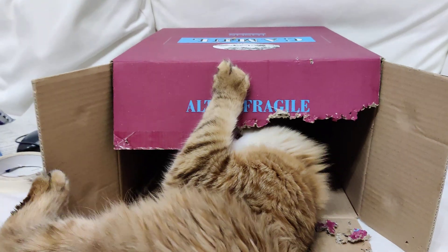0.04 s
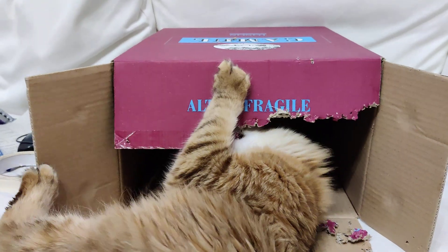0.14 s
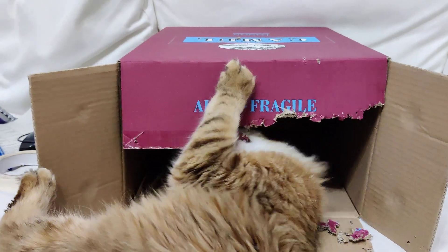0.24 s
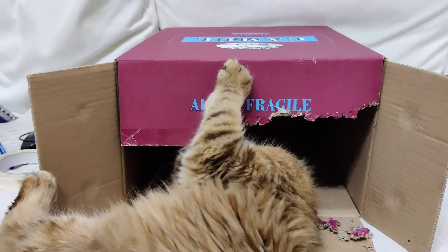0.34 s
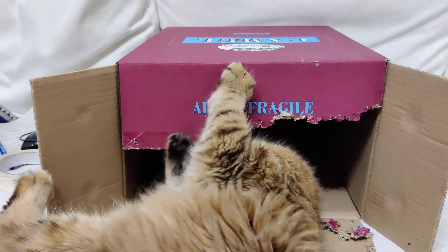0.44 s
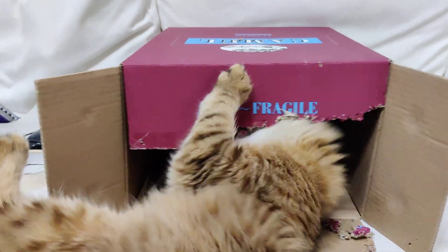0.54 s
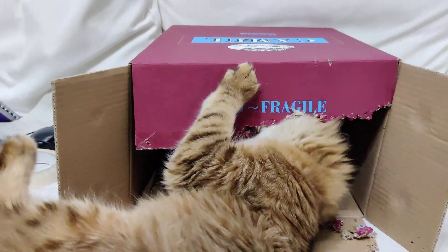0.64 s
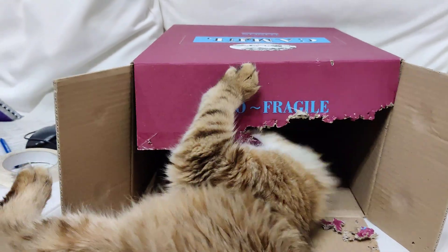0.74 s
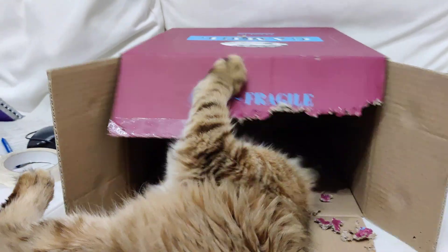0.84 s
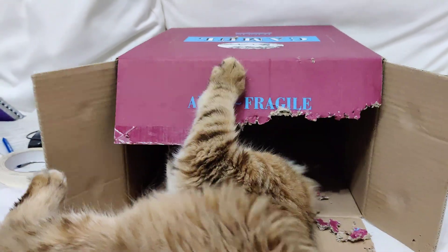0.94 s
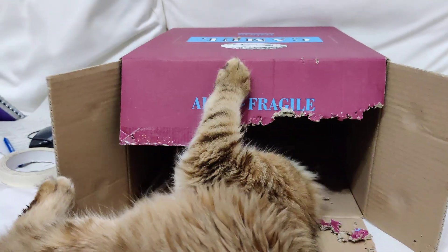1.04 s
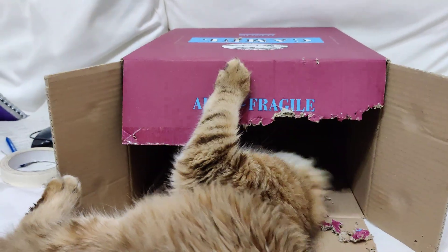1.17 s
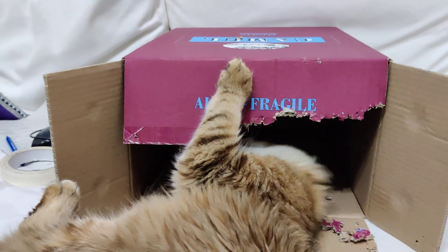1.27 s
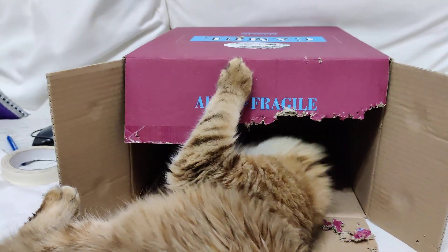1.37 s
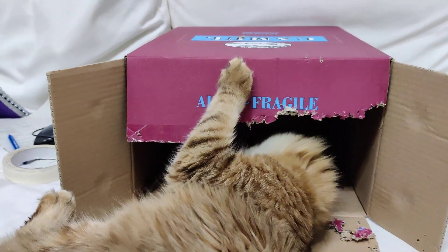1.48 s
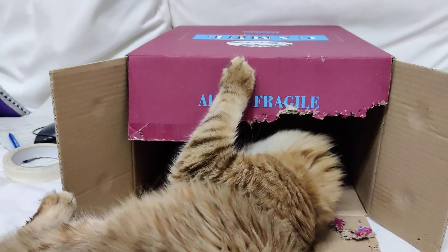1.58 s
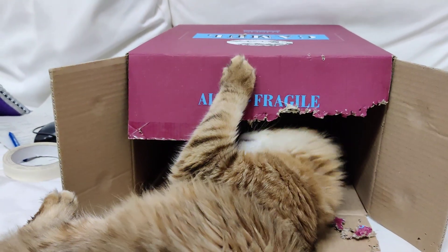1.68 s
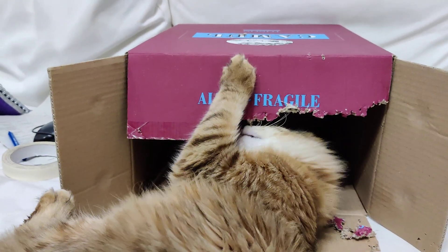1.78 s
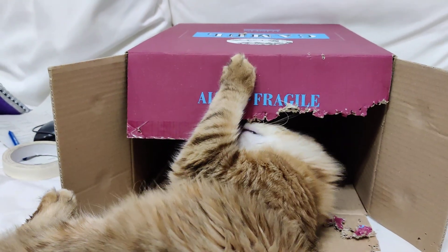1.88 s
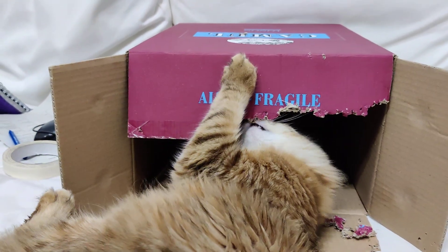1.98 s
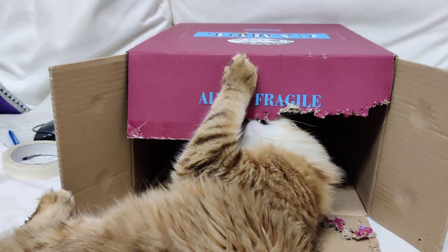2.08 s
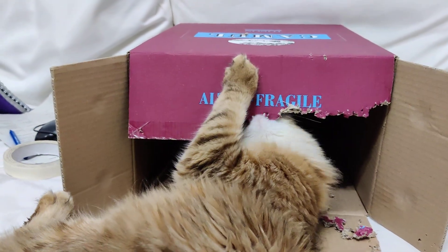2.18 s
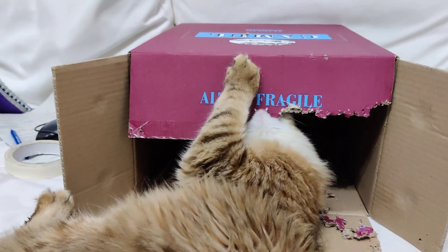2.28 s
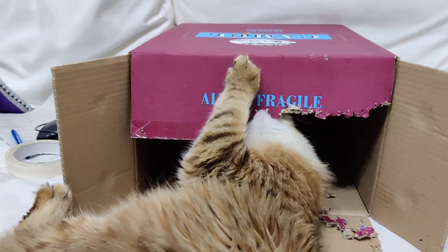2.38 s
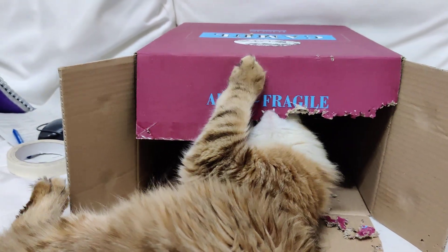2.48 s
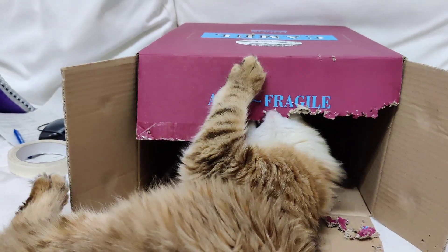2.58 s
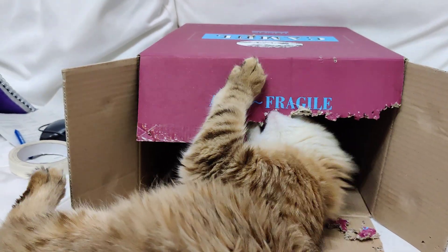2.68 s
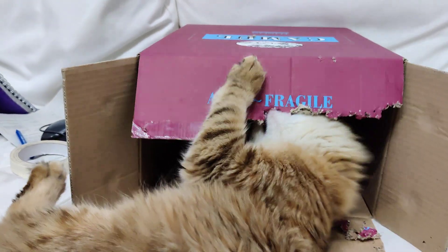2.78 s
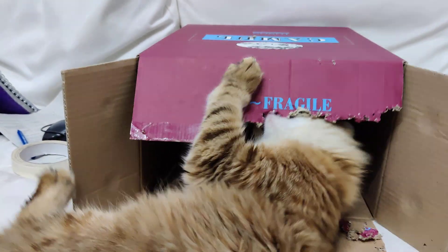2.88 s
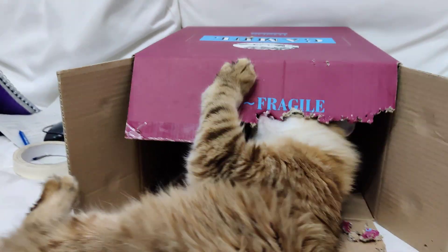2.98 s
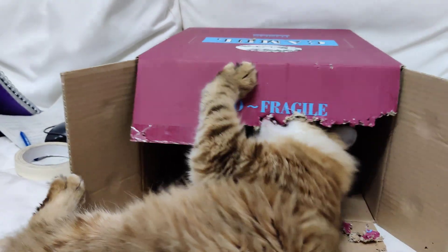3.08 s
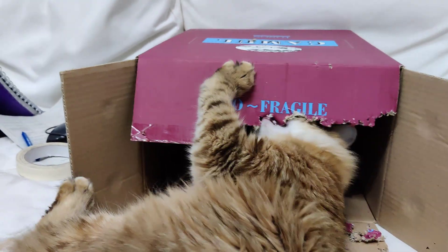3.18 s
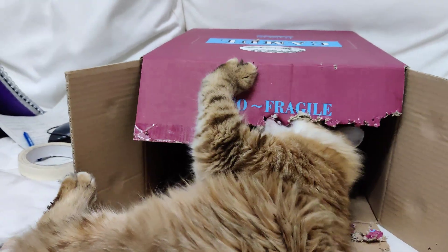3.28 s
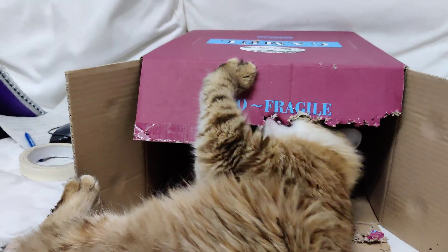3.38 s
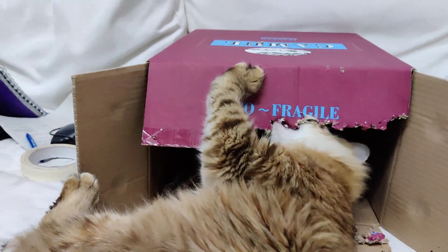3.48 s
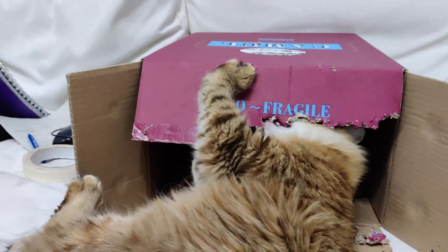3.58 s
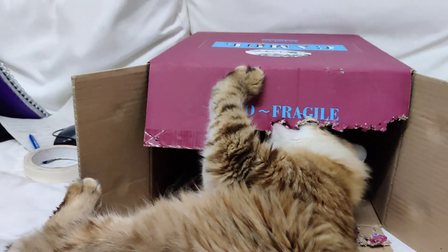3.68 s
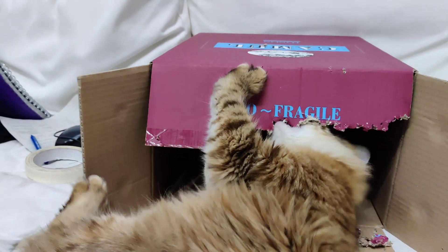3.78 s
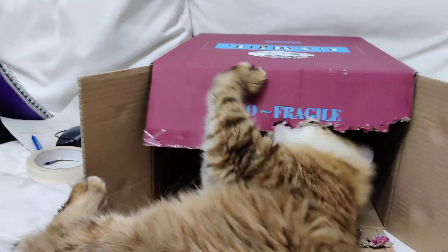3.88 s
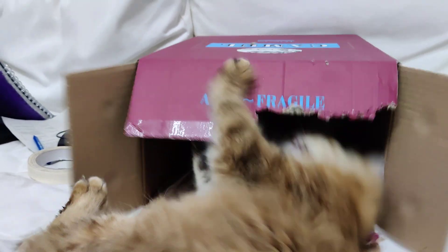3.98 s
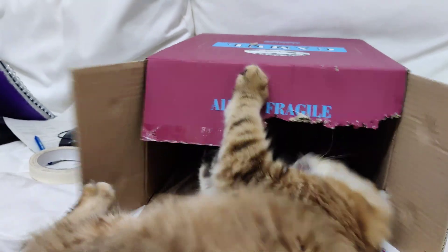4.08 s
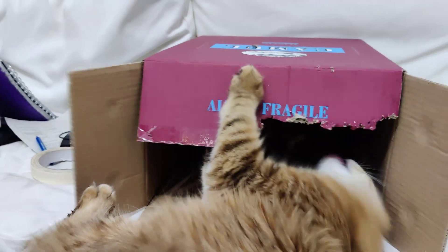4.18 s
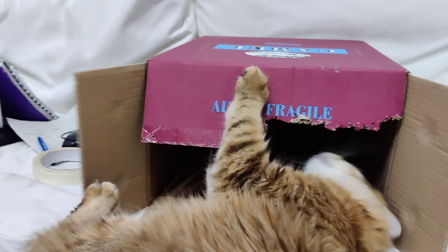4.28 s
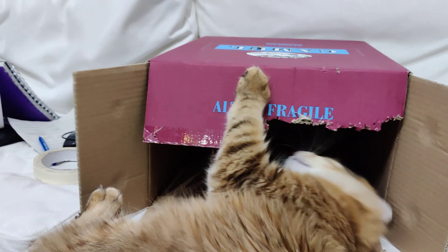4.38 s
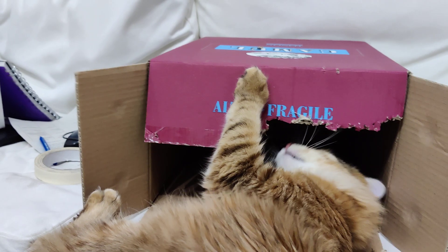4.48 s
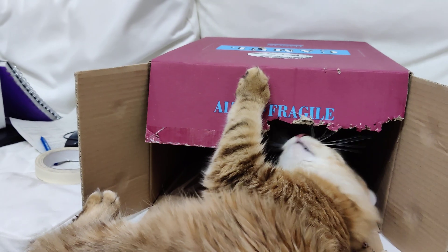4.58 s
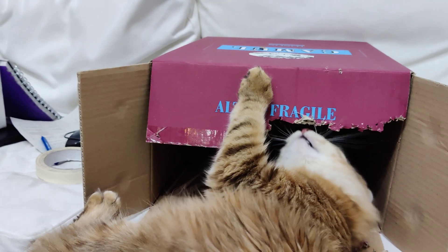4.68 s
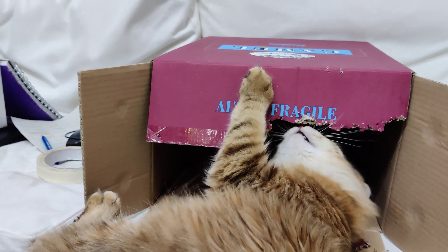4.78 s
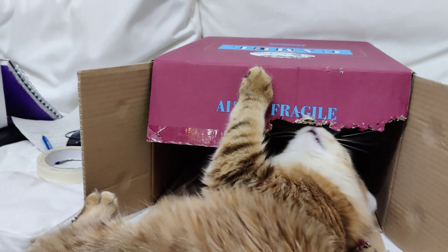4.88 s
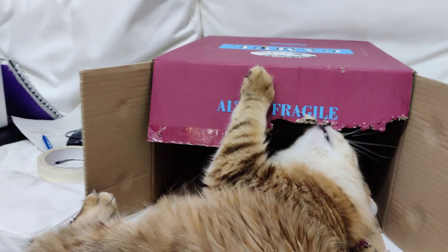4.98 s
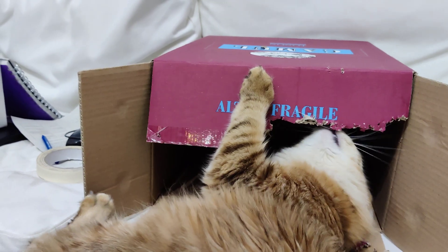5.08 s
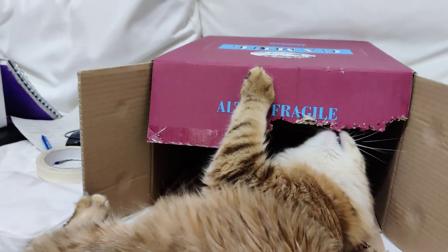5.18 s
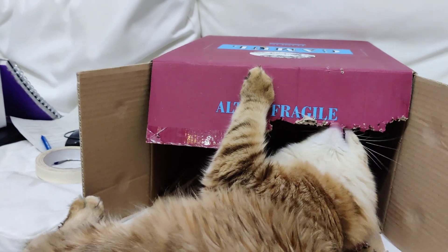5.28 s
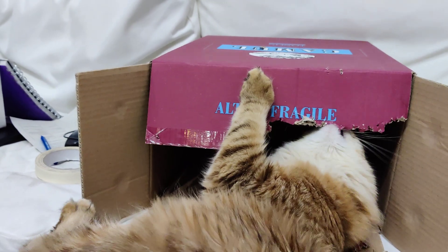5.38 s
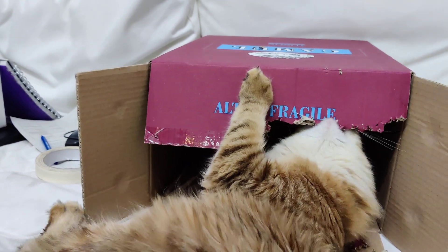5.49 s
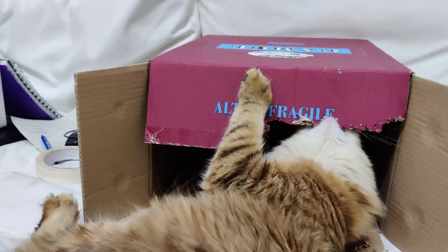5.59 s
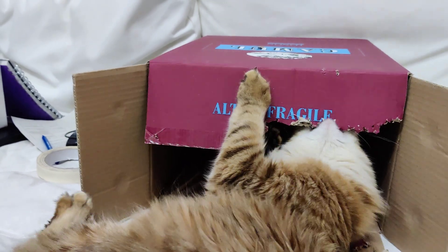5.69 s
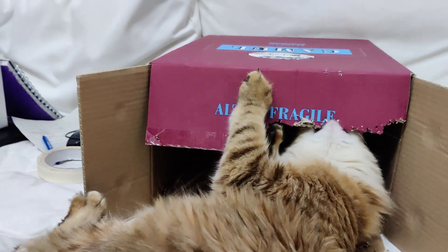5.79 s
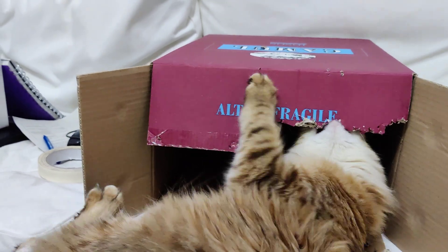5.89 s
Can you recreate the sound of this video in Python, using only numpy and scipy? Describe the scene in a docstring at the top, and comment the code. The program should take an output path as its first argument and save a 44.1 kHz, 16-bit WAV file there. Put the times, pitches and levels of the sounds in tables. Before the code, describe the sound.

Close cardboard bites and ripping scrapes, two heavy boxy thumps, a short creak and soft nose huffs from a cat on bedding.

```python
"""A faint background murmurs first, and teeth already scrape softly at the flap of a cardboard box.
A cat gnaws and tugs at that flap on a bed, close to a small stereo microphone, a quiet room behind.
Random slips and bites ring the walls, flap and torn edge as dying sines; fibres tear as coloured noise.
Tugs thump the box through low modes, fur rustles and the bed sways as noise, the cat huffs through its
nose, and one bent wall creaks."""
import sys
import numpy as np
from scipy import signal
from scipy.fft import rfft, irfft, next_fast_len
from scipy.io import wavfile
from scipy.ndimage import uniform_filter1d

SR = 44100
rng = np.random.default_rng(int(sys.argv[2]) if len(sys.argv) > 2 else 0)


def materialize(psi):
    """Save the field psi as 16-bit PCM at rate SR to the path in sys.argv[1].

    A 1-D psi becomes a single channel; in a 2-D psi each row is a channel.
    """
    bounded = np.clip(np.atleast_2d(psi).T, -1, 1)
    quanta = np.round(bounded * 32767).astype(np.int16)
    wavfile.write(sys.argv[1], SR, quanta)


N = 261954  # samples

# Spectrum of the background. Each row: frequency in Hz, relative level in dB per Hz.
BACKGROUND_SPECTRUM = [(35, -23.5), (60, 1.5), (207, -13.5), (363, -19), (448, -19), (1010, -38),
                       (3340, -34), (3850, -32.5), (4420, -37), (12400, -42.5), (16000, -39.5)]
# Blurred tones in the background. Each row: frequency in Hz, width in Hz, level against the noise in dB.
HUM_TONES = [(102.7, 12, 0.5), (213, 45, -9), (3840, 60, -22)]
# Rise and fall of the background. Each row: time in seconds, level in dB.
BACKGROUND_LEVEL = [(0, -63), (1.5, -59.5), (3.8, -60), (4.9, -66), (5.1, -84.5), (5.28, -95), (5.4, -66.5),
                    (5.94, -95)]

# How hard the jaws work on the flap. Each row: time in seconds, level in dB.
GNAW_LEVEL = [(0, -65), (.34, -80.5), (.56, -64), (.94, -45.5), (1.16, -61), (1.47, -76.5), (1.88, -67),
              (2.2, -79), (2.41, -71), (2.6, -54), (3.22, -56), (3.36, -63), (3.9, -73.5), (4.12, -43),
              (4.33, -67.5), (4.8, -77), (5.3, -86.5), (5.52, -72.5), (5.8, -56)]
# Teeth and claws drag along the flap and let go.
# Each row: start in seconds, length in seconds, level in dB, tearing against that level in dB.
DRAGS = [(0.36, 0.05, -51.5, -13.5), (0.415, 0.015, -48.5, -16.5), (0.424, 0.11, -56.5, -3),
         (0.542, 0.041, -56.5, -11.5), (0.738, 0.049, -51, -7), (0.895, 0.066, -43.5, -3.5),
         (2.467, 0.13, -51.5, -1), (2.611, 0.031, -53.5, 2), (2.646, 0.14, -57, 4), (2.756, 0.14, -52, 2),
         (2.927, 0.069, -52, -2.5), (2.999, 0.037, -77, 23.5), (3.075, 0.061, -63, -15),
         (3.129, 0.043, -50, -9.5), (3.178, 0.073, -51, -6), (3.603, 0.08, -64, 2.5),
         (4.0, 0.029, -49.5, 1.5), (4.021, 0.044, -32.5, -4.5), (4.116, 0.033, -46.5, -5.5),
         (5.817, 0.047, -49.5, 1)]
# Edge, fibres and finest fibres in a drag. Each row: level against the drag in dB, share of the tearing dB.
DRAG_PARTS = [(-3, 0.25), (0.5, .95), (-14.5, 1.2)]
# Bites and claw catches. Each row: start in seconds, strength in dB, place as edge minus walls in dB,
# fibre crack against the strength in dB.
BITES = [(0.641, -58, 7, 0), (.666, -31.5, -60, -21), (0.846, -47, -8.5, -15.5),
         (.919, -15.5, -20.5, -19.5), (.924, -20, -12.5, -9), (.939, -24, 28.5, -7),
         (1.345, -42.5, -6, -15), (1.374, -52.5, 12, -8), (2.048, -53, 25, -7), (2.343, -45, -20, -32),
         (2.411, -38.5, -11, -22), (2.467, -31.5, -7.5, -7.5), (2.68, -36.5, -5, -10.5),
         (2.845, -29, -7.5, -12.5), (3.082, -37.5, 10, -8.5), (3.201, -34, -29, -15),
         (3.295, -34.5, 28, -6.5), (3.309, -35.5, 11, -7), (3.354, -34.5, 2.5, -6),
         (3.542, -47.5, -18, -14), (3.602, -48.5, -1.5, -5), (3.67, -47.5, -8, -3.5),
         (3.904, -45.5, -10.5, -24.5), (3.958, -47.5, -1, -2), (4.039, -22, -5.5, -9),
         (4.051, -17, -11, -16.5), (4.402, -39.5, -15, -29.5), (5.539, -43.5, -16, -40),
         (5.613, -39, -8, -42.5), (5.762, -23.5, -7.5, -8), (5.84, -35.5, 17, -11)]
# How long a bite drives walls, flap, edge and fibres: four times to fall 60 dB, in seconds.
BITE_T60 = (0.071, 0.046, 0.047, 0.042)
# Single fibres snap. Each row: start in seconds, level in dB.
SNAPS = [(2.4897, -42.5), (2.5542, -57), (2.84, -37), (2.8923, -43), (2.9547, -58), (2.9736, -49),
         (2.9965, -38.5), (3.0164, -45), (3.1393, -52), (3.355, -39), (3.482, -56.5), (3.6714, -43.5)]
# Fur slides softly along the torn edge. One row: start in seconds, length in seconds, level in dB.
RUB = (5.33, 0.4, -64)
# Modes of box walls and cavity. Each row: frequency in Hz, relative level in dB, 60 dB decay in seconds.
WALL_MODES = [(244, -9, 0.016), (338, -6.5, 0.027), (348.7, 4.5, 0.041), (425, 1.5, 0.021)]
# Modes of the flap. Each row: frequency in Hz, relative level in dB, 60 dB decay in seconds.
FLAP_MODES = [(614, -6, 0.079), (700, -1, 0.055), (769.5, 2, 0.04), (856, -11, 0.052)]
# Modes of its torn edge. Each row: frequency in Hz, relative level in dB, 60 dB decay in seconds.
EDGE_MODES = [(1167, -3, 0.03), (1280, -2.5, 0.026), (1508, 3, 0.011), (1714, -5, 0.022),
              (2320, -4, 0.0033), (2550, -7, 0.0035)]
# Spectrum of tearing fibres. Each row: frequency in Hz, relative level in dB per Hz.
FIBRE_SPECTRUM = [(1470, -38), (2500, -14), (2740, -10.5), (3490, -6.5), (4210, -3.5), (5070, -10),
                  (5520, -10.5), (6650, -3.5), (8020, -13.5), (14400, -13), (16000, -25.5)]
# Spectrum of the finest fibres. Each row: frequency in Hz, relative level in dB per Hz.
FINEST_SPECTRUM = [(7000, -34.5), (10000, -12.5), (12500, -2.5), (15500, -4.5), (16200, -23.5)]

# How much the cat's body shifts on the bed. Each row: time in seconds, level in dB.
BODY_SHIFT = [(0, -74.5), (.36, -73), (.6, -69), (.94, -50), (1.16, -59.5), (1.47, -75.5), (1.8, -71),
              (2.25, -80), (2.55, -63.5), (3.0, -58.5), (3.25, -49.5), (3.64, -81), (3.95, -77.5),
              (4.12, -44.5), (4.33, -71.5), (4.85, -80.5), (5.15, -93.5), (5.52, -67.5), (5.94, -60.5)]
# Spectrum of fur on cloth. Each row: frequency in Hz, relative level in dB per Hz.
RUSTLE_SPECTRUM = [(290, -28.5), (500, -4), (883, -2.5), (1450, -5.5), (1760, -3.5), (9000, -22.5),
                   (11700, -56.5), (19800, -120)]
# Spectrum of the swaying mattress. Each row: frequency in Hz, relative level in dB per Hz.
SWAY_SPECTRUM = [(4.7, -45.5), (8.0, 0), (23, -7.5), (38, -1), (102, -18), (167, -19.5), (204, -19),
                 (250, -35), (320, -63), (550, -120)]

# The whole box jolts on the bed. Each row: start in seconds, level in dB, hardness in octaves above 50 Hz.
JOLTS = [(0.665, -15.5, 1.5), (0.686, -26.5, -0.4), (.921, -8.5, 0.82), (0.942, -16.5, 0),
         (1.648, -34.5, -1.0746), (2.344, -34.5, .6), (2.368, -35, -0.8), (2.864, -30.5, 0.7),
         (3.3, -32, .9), (3.334, -31.5, 0.54), (3.371, -26, 0.53), (4.03, -26, 2.1), (4.053, -12, .4),
         (4.089, -23.5, 1), (5.541, -36, 1), (5.616, -42.5, 1), (5.635, -34, .05), (5.766, -34, 0.081)]
# Modes of box and mattress. Each row: frequency in Hz, level against the jolt in dB.
BED_MODES = [(10, 24.5), (33, -0.5), (49, -2), (58, 0.5), (68, -1), (87, 0), (112, -2.5), (158, -8),
             (215, -4.5)]

# The cat blows through its nose.
# Each row: start in seconds, level in dB, rise in seconds, 60 dB decay in seconds.
HUFFS = [(1.631, -58.5, 0.03, 0.82), (1.704, -48.5, 0.0081, 0.43), (1.868, -60.5, 0.0043, 0.46),
         (5.27, -47.5, 0.14, 0.64)]
# Spectrum of the nose. Each row: frequency in Hz, relative level in dB per Hz.
NOSE_SPECTRUM = [(620, -22), (1050, -7), (1410, -5.5), (2040, -8), (2400, -6.5), (2770, -9), (9000, -22),
                 (11700, -32), (19800, -120)]

GROAN_S = 0.11  # length of the creak in seconds
# A wall bends under the pull and creaks. One row: start in seconds, length in seconds, level in dB.
GROAN = (3.198, GROAN_S, -35.5)
# Modes of the bent wall. Each row: frequency in Hz, relative level in dB, 60 dB decay in seconds.
BENT_WALL_MODES = [(203, 1.5, 0.064), (212, 1.5, 0.12), (406, -15, 0.03), (465.6, 7.5, 0.11),
                   (520, -31, 0.066)]

# Decay of the room. Each row: frequency in Hz, 60 dB decay in seconds.
ROOM_DECAY = [(200, 0.057), (1000, 0.47), (4000, 0.43), (12000, 0.27)]
# Width at the microphone. Each row: frequency in Hz, side minus mid in dB.
SIDE_LEVEL = [(40, -26), (250, -21), (600, -10), (1300, -3), (3000, 0)]
# Balance at the microphone. Each row: frequency in Hz, left minus right in dB.
LEFT_LEAN = [(60, .2), (250, 1), (700, -.3), (1400, 3), (2800, -1.5), (5500, -2.5), (12000, -1)]


def gain_of(db):
    """Decibels to a factor."""
    return 10 ** (np.asarray(db) / 20)


def evened(x):
    """Scales to rms 1."""
    return x / np.sqrt(np.mean(x ** 2) + 1e-20)


def read(points, hz):
    """Reads a table on a log-frequency axis."""
    f, value = np.transpose(points)
    return np.interp(np.log(hz + 1), np.log(f + 1), value)


def curve(rows, follow=1):
    """A table of time and dB as a gain for every sample, followed by a share of its dB."""
    s, db = np.transpose(rows)
    return gain_of(follow * np.interp(np.arange(N) / SR, s, db))


def add(mix, s, sound):
    """Adds a sound at s seconds, cut at the end of the mix."""
    part = mix[..., round(s * SR):][..., :sound.shape[-1]]
    part += sound[..., :part.shape[-1]]


def colour(points):
    """A causal minimum-phase filter of energy 1 with the given spectrum, floored at -100 dB."""
    db = np.maximum(read(points, np.fft.rfftfreq(16384, 1 / SR)), -100)
    half = np.log(gain_of(db))
    both_halves = np.r_[half, half[-2:0:-1]]
    taps = np.fft.ifft(np.exp(np.conj(signal.hilbert(both_halves)))).real[:8192]
    return taps / np.linalg.norm(taps)


def ring(modes):
    """Dying sines of energy 1 in all."""
    t = np.arange(SR // 4) / SR
    taps = sum(gain_of(db - 60 * t / t60) * np.sin(2 * np.pi * hz * t) for hz, db, t60 in modes)
    return taps / np.linalg.norm(taps)


def through(x, taps):
    """Convolution cut to length."""
    return signal.oaconvolve(x, taps[None], axes=1)[:, :N]


def noise(length=N):
    """White noise in two layers, which ports() takes as sum and difference."""
    return rng.standard_normal((2, length))


def grains(per_s, spread_db, clump_db):
    """Random slips of uneven size that come in clumps of some 15 ms, at rms 1."""
    clumps = evened(uniform_filter1d(uniform_filter1d(rng.standard_normal(N), 600), 600))
    size = gain_of(spread_db * np.minimum(rng.exponential(1, N), 5) + clump_db * clumps)
    slips = rng.random(N) < per_s / SR
    return evened(size * slips * noise())


def background():
    """Broad noise with a few blurred tones (noise through narrow resonances), rising and falling together."""
    hum = sum(gain_of(db) * through(noise(), ring([(hz, 0, 2.2 / width)])) for hz, width, db in HUM_TONES)
    return curve(BACKGROUND_LEVEL) * (through(noise(), colour(BACKGROUND_SPECTRUM)) + hum)


def steady_scrape():
    """Coarse slips drive walls, flap and edge alike; dense fine slips tear the fibres."""
    walls = curve(GNAW_LEVEL) * grains(per_s=690, spread_db=-1.0, clump_db=6.0)
    tearing_db = -6  # against the scrape on the walls
    fibres = curve(GNAW_LEVEL) * gain_of(tearing_db) * grains(per_s=12000, spread_db=2.2, clump_db=2.5)
    return walls, gain_of(-2.5) * walls, gain_of(-14.5) * walls, fibres


def add_drags(walls, flap, edge, fibres, finest, rasp):
    """Dragging teeth and claws stick and slip: stretches of dense grains shake the board and tear it."""
    fine_slips = grains(per_s=6000, spread_db=3.2, clump_db=2.5)
    for s, length, db, tearing_db in DRAGS:
        count = round(length * SR)
        span = slice(round(s * SR), round(s * SR) + count)
        hold = gain_of(db) * signal.windows.tukey(count, .45)
        add(flap, s, hold * rasp[:, span])
        add(walls, s, gain_of(1.5) * hold * rasp[:, span])  # the flap shakes the walls it hangs on
        for part, slips, (part_db, share) in zip((edge, fibres, finest), (rasp, rasp, fine_slips), DRAG_PARTS):
            add(part, s, gain_of(part_db + share * tearing_db) * hold * slips[:, span])


def add_bites(walls, flap, edge, fibres):
    """A bite is a dying noise push, shared between walls, flap and edge by its place."""
    rise_s, flap_db, flap_loss = .002, 1.5, 0.079  # the flap loses a share of the place dB either way
    t = np.arange(SR // 5) / SR
    for s, db, place_db, crack_db in BITES:
        board = gain_of([-place_db / 2, flap_db - flap_loss * abs(place_db), place_db / 2])
        shares = [*board / np.linalg.norm(board), gain_of(crack_db)]
        for part, share, t60 in zip((walls, flap, edge, fibres), shares, BITE_T60):
            push = gain_of(db - 60 * t / t60) * np.minimum(t / rise_s, 1)
            add(part, s, share * push * noise(len(t)))


def add_snaps(finest):
    """A snapping fibre is an instant burst of noise that falls 60 dB in 10 ms."""
    t = np.arange(SR // 5) / SR
    for s, db in SNAPS:
        add(finest, s, gain_of(db - 60 * t / 0.01) * noise(len(t)))


def add_rub(edge, rasp):
    """Sliding fur drives the torn edge with soft dense slips."""
    s, length, db = RUB
    start, count = round(s * SR), round(length * SR)
    add(edge, s, gain_of(db) * signal.windows.tukey(count, .3) * rasp[:, start:start + count])


def gnawing():
    """Steady slips, drags, bites, snaps and a rub ring the walls, flap and edge and colour the fibres."""
    walls, flap, edge, fibres = steady_scrape()
    finest = np.zeros((2, N))
    rasp = grains(per_s=12000, spread_db=2.4, clump_db=1.5)
    add_drags(walls, flap, edge, fibres, finest, rasp)
    add_bites(walls, flap, edge, fibres)
    add_snaps(finest)
    add_rub(edge, rasp)
    board = through(walls, ring(WALL_MODES)) + through(flap, ring(FLAP_MODES)) + through(edge, ring(EDGE_MODES))
    return board + through(fibres, colour(FIBRE_SPECTRUM)) + through(finest, colour(FINEST_SPECTRUM))


def bedding():
    """Fine rustle of fur on cloth as dense grains, and the slow sway of the mattress as low noise."""
    slips = grains(per_s=12000, spread_db=1.5, clump_db=1.5)
    rustle = through(curve(BODY_SHIFT) * slips, colour(RUSTLE_SPECTRUM))
    # the mattress follows the body by a share of its dB
    sway = gain_of(-3) * curve(BODY_SHIFT, follow=0.76) * through(noise(), colour(SWAY_SPECTRUM))
    return rustle + sway


def thumps():
    """Each jolt swings the low modes of box and mattress, hard jolts the higher ones."""
    cycles, miss_db_per_octave = 14.7, 19.5  # swings until 60 dB down; loss away from the hardness
    onset_s = 0.0056
    out, t = np.zeros(N), np.arange(SR // 2) / SR
    for s, db, octaves in JOLTS:
        for hz, mode_db in BED_MODES:
            miss_db = miss_db_per_octave * abs(np.log2(hz / 50) - octaves)
            swing = -np.sin(2 * np.pi * hz * t) * (1 - np.exp(-t / onset_s))
            add(out, s, gain_of(db + mode_db - miss_db - 60 * t * hz / cycles) * swing)
    return out


def huffs():
    """Puffs of air noise, rising then dying, coloured by the nose."""
    air, t = np.zeros((2, N)), np.arange(SR // 2) / SR
    for s, db, rise, t60 in HUFFS:
        puff = gain_of(db - 60 * t / t60) * np.minimum(t / rise, 1) ** 2
        add(air, s, puff * noise(len(t)))
    return through(air, colour(NOSE_SPECTRUM))


def groan():
    """Uneven slips under a slackening pull ring the bent wall."""
    s, length, db = GROAN
    count = round(length * SR)
    pull = np.zeros(N)
    add(pull, s, gain_of(db) * signal.windows.tukey(count, .08) * np.linspace(1, .6, count))
    return through(pull * grains(per_s=6000, spread_db=0, clump_db=.6), ring(BENT_WALL_MODES))


def room(x):
    """Sparse reflections of random sign, one in every 20 samples, each band dying at its own speed."""
    taps = np.zeros((2, SR // 2))
    slots = np.arange(300, SR // 2 - 20, 20)  # the first some 7 ms after the direct sound
    at = slots + rng.integers(0, 20, (2, len(slots)))
    np.put_along_axis(taps, at, rng.choice([-1., 1.], at.shape), 1)
    hz, t, z = signal.stft(taps, SR, nperseg=256)
    decay = gain_of(-60 * t / read(ROOM_DECAY, hz)[:, None])
    tail = signal.istft(z * decay, SR, nperseg=256)[1]
    return signal.fftconvolve(x, tail / np.linalg.norm(tail[0]), axes=1)[:, :N]


def ports(x):
    """Sum and difference of the microphone's two ports to left and right: bass alike, treble unlike."""
    size = next_fast_len(N + SR // 10)
    hz = np.fft.rfftfreq(size, 1 / SR)
    mid, side = rfft(x, size)
    side = side * gain_of(read(SIDE_LEVEL, hz))
    lean = gain_of(read(LEFT_LEAN, hz) * np.array([[.5], [-.5]]))
    return irfft(np.array([mid + side, mid - side]) * lean, size)[:, :N]


def scene():
    """Cat and box close to the microphone, the room behind, and thumps a little to the left."""
    near = gnawing() + groan() + huffs()
    reflected = gain_of(-10) * room(near)
    return ports(near + reflected + bedding() + background()) + thumps() * gain_of([[.4], [-.4]])


def top_cut(x):
    """Nothing passes above the cut-off."""
    return signal.sosfilt(signal.butter(12, 16650, fs=SR, output="sos"), x)


def record(dry):
    """Limits the band to 15.9 kHz and returns the finished mix."""
    low_pass = signal.firwin(511, 15900, window=("kaiser", 7), fs=SR)
    limited = signal.oaconvolve(dry, low_pass[None], "same")
    return top_cut(limited)


dry = scene()
out = record(dry)
materialize(out)
```